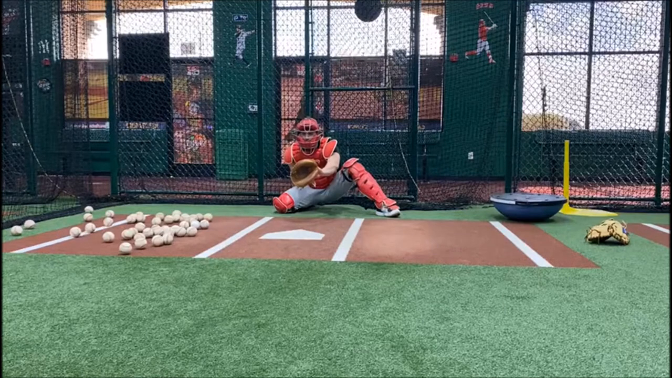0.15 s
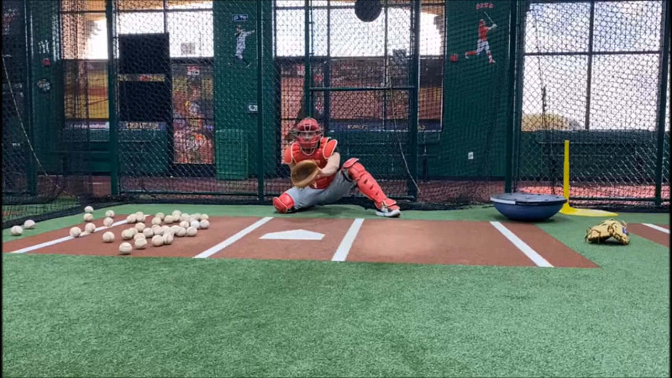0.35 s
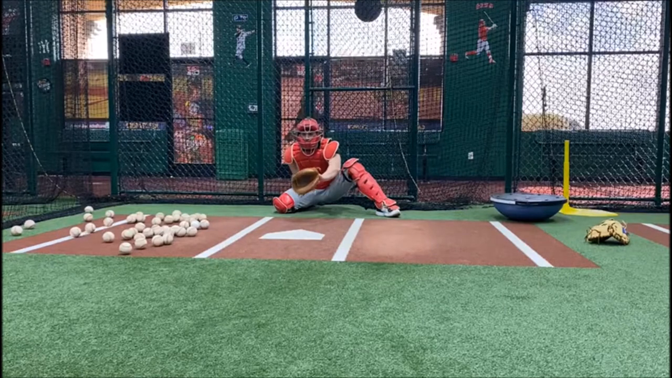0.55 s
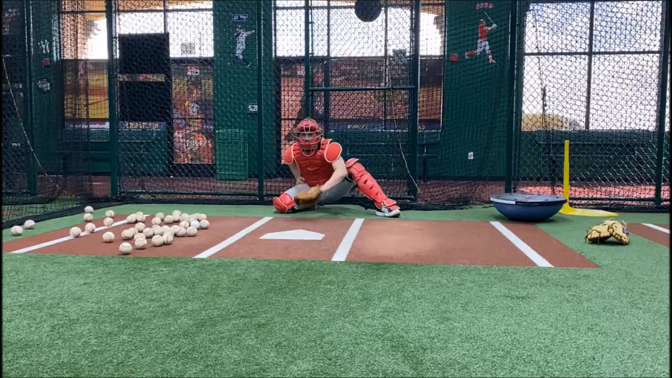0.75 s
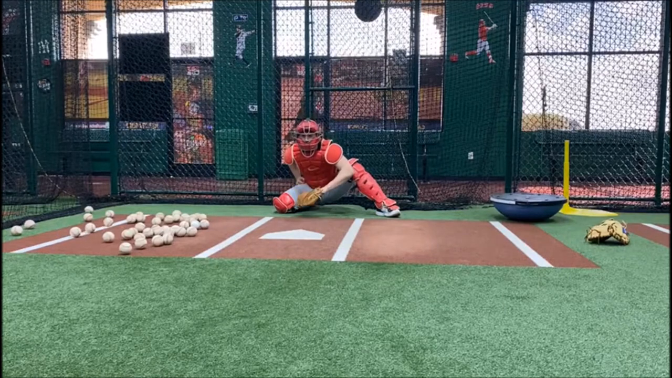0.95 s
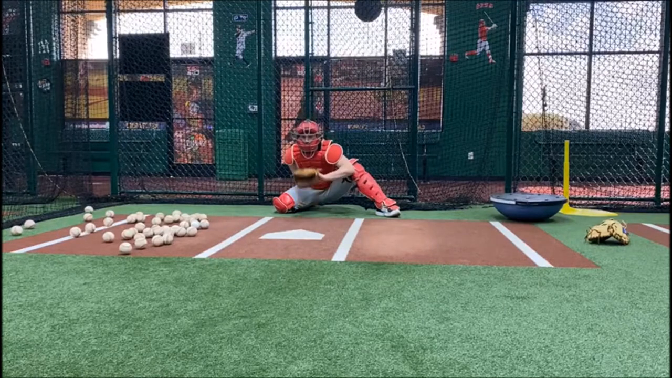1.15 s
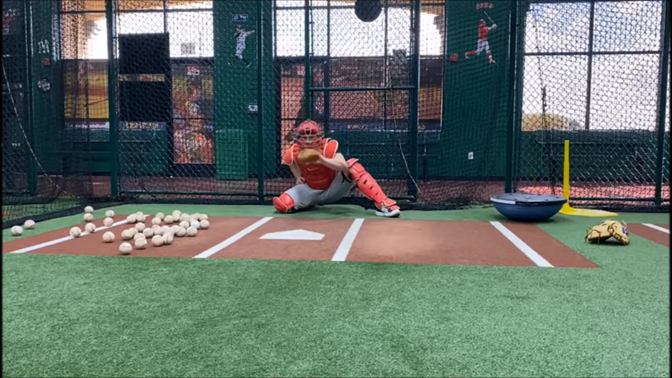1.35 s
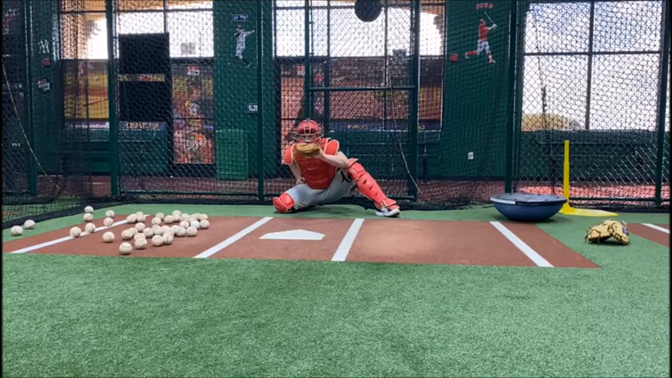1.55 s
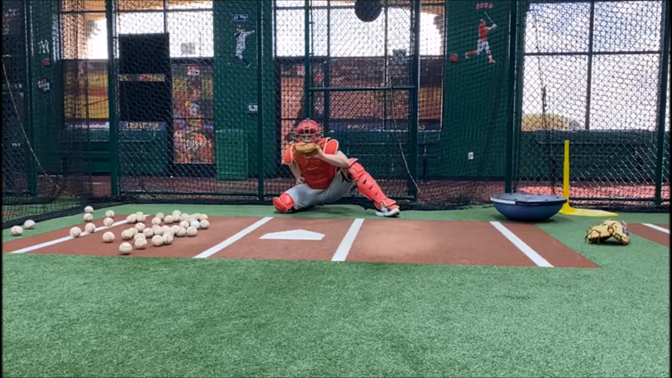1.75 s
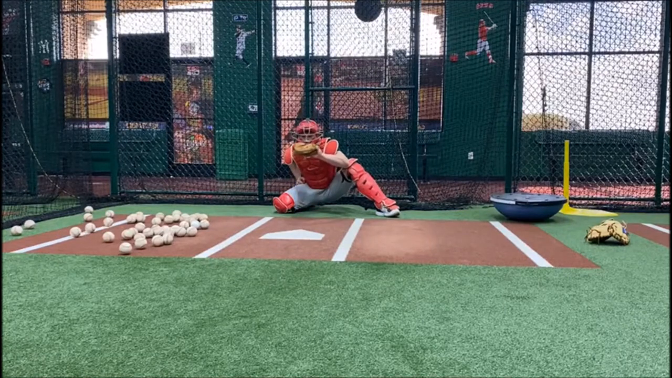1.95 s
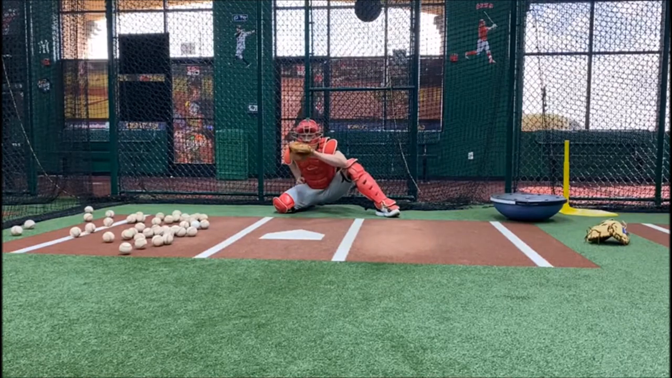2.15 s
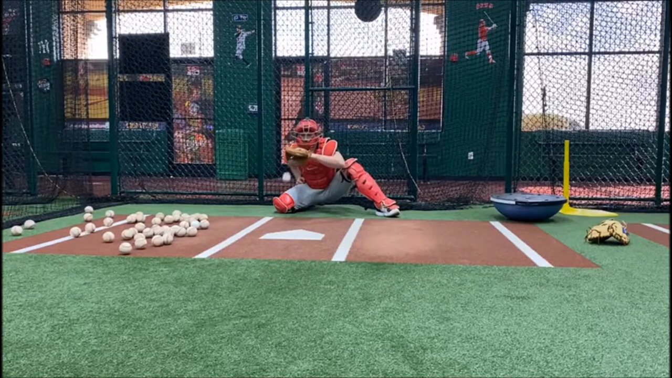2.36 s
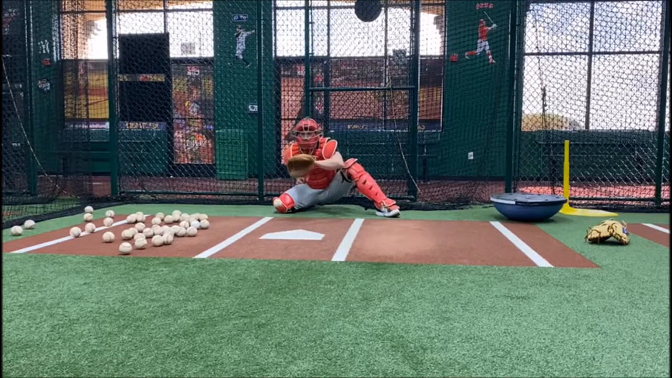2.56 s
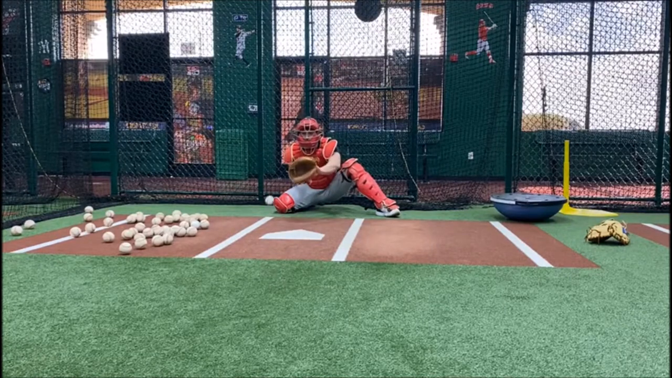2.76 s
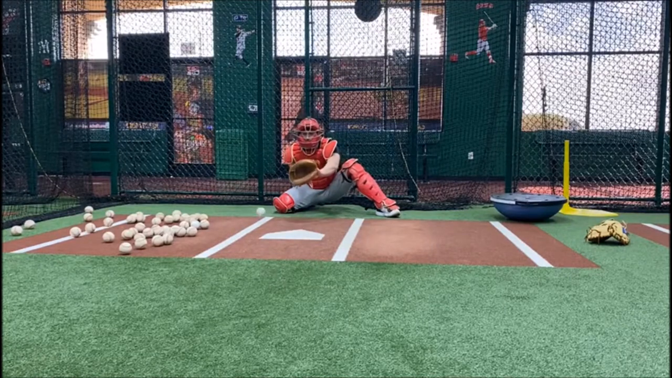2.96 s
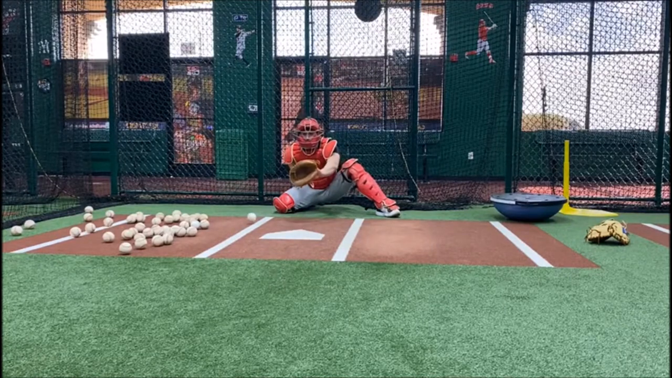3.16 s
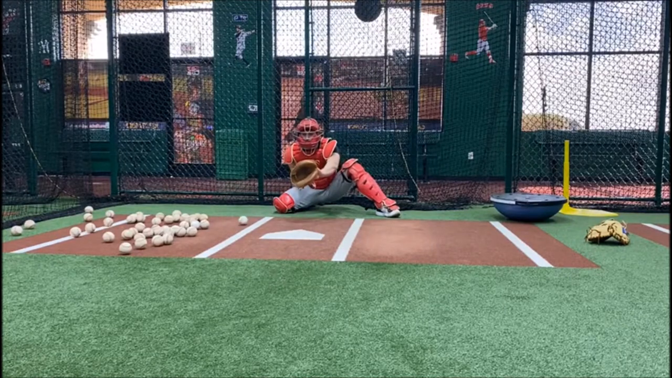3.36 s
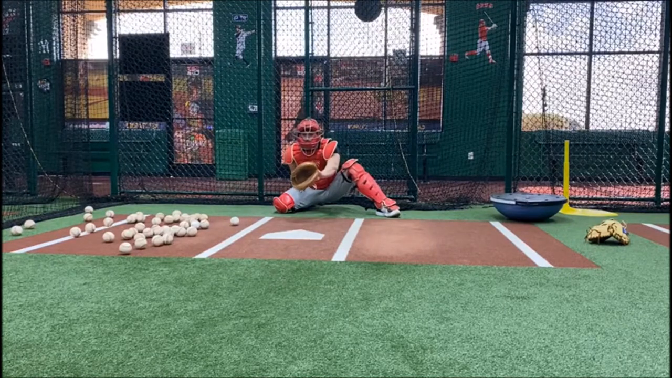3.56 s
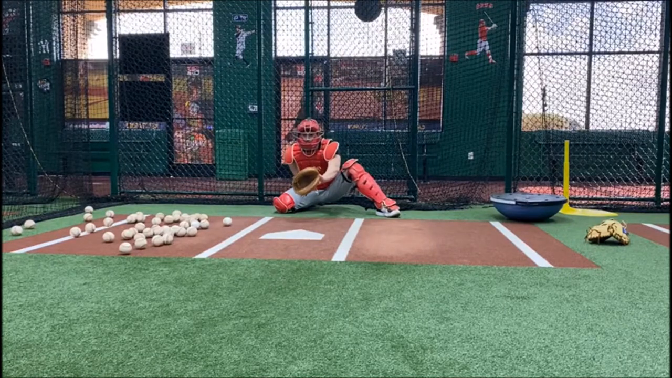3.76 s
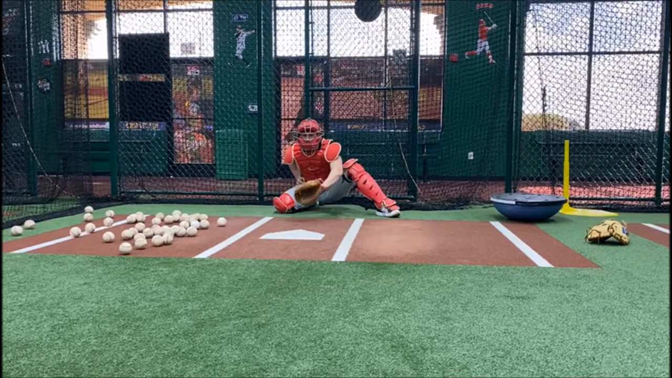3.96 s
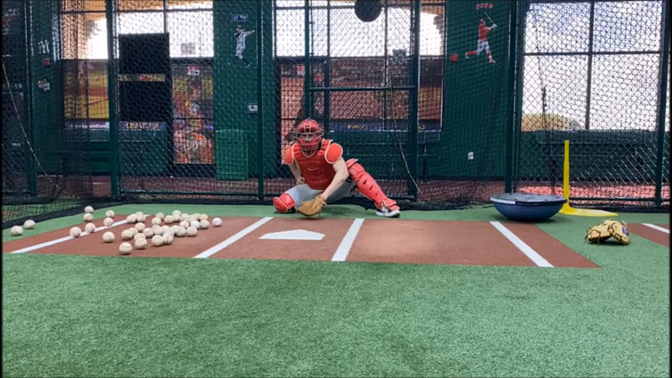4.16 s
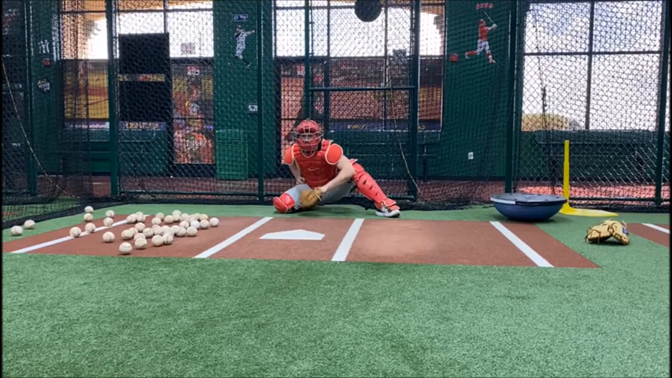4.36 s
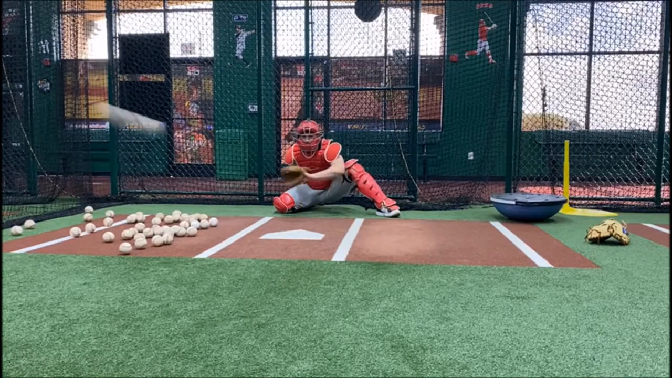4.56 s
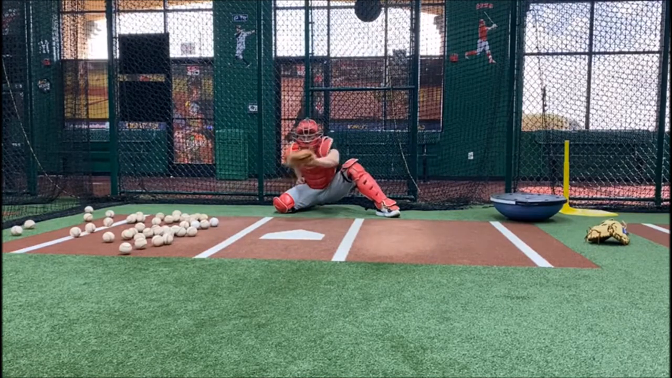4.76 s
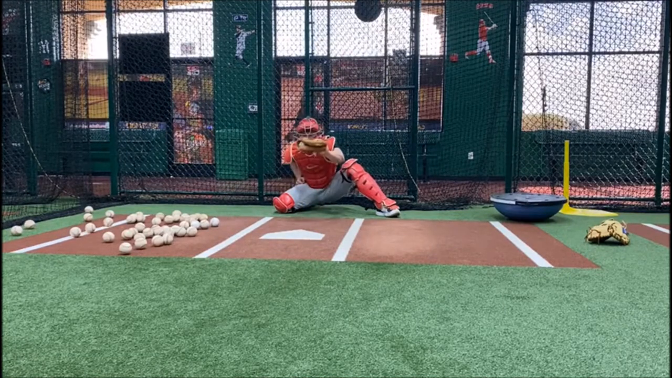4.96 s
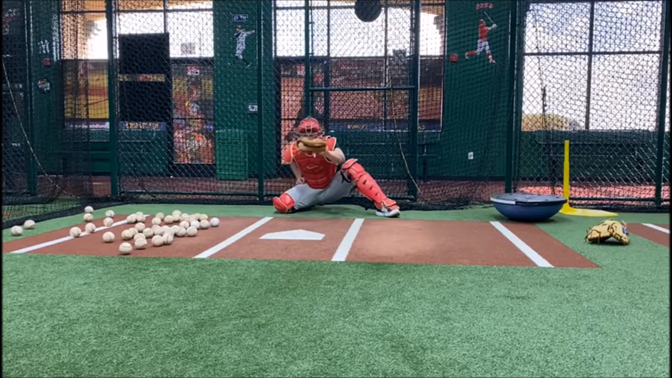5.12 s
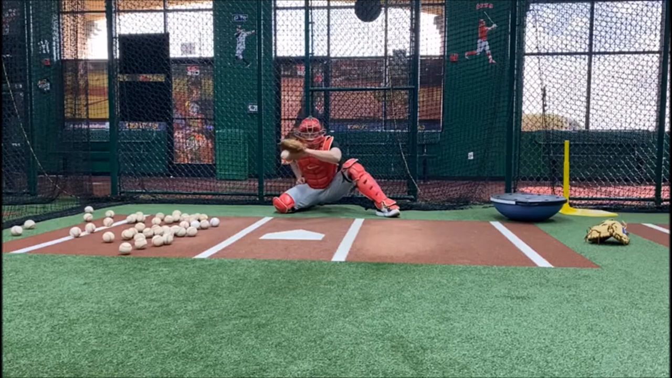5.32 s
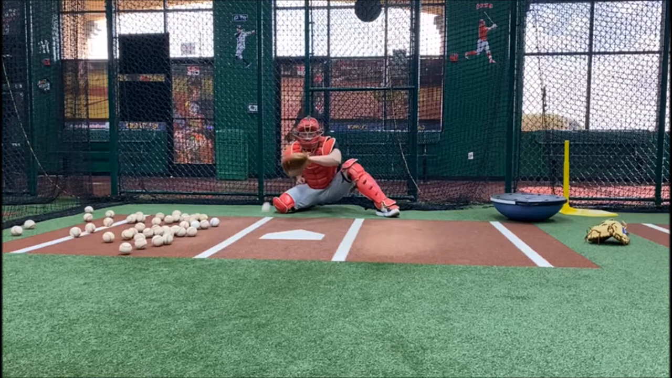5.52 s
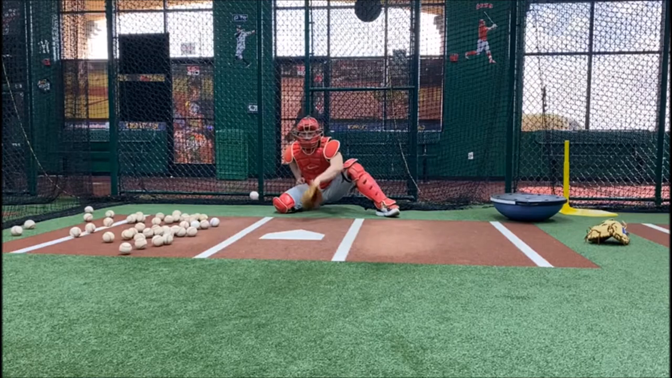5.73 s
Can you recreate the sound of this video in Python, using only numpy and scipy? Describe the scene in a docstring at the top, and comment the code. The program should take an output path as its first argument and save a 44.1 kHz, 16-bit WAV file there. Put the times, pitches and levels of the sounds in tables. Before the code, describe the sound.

Faint vent noise, a motor hum and a light wheel whirr run throughout in a large, echoing indoor batting cage. A dull boom and a knock come from another lane at the very start. At about 0.9 seconds a distant pitching machine bangs and clanks, its steel frame ringing. At 1.4 seconds a baseball cracks into a leather mitt close by, the loudest sound, with tiny leather creaks and quick wall echoes. A spent ball thuds softly on the turf at 2.5 seconds and bounces once. Faint, thin squeals glide by between 3.6 and 4.1 seconds. The machine bangs again, more softly, at 4.2 seconds, leaving a loose panel droning briefly. At 4.7 seconds the second ball lands in the mitt with a quieter, duller pop. Faint far knocks follow around 5 seconds, and another ball drops on the turf at 5.6 seconds.

```python
"""Two catches in an indoor batting cage

A pitching machine bangs far off. Half a second later the ball cracks into a leather mitt close by,
and the walls and hall answer. This happens twice; the first crack makes the volume duck briefly.
Spent balls drop on the turf, other lanes knock, and faint squeals glide by.
Behind it all, the vents blow, a motor hums and the machine's wheel whirrs."""
import sys
import numpy as np
from scipy import signal
from scipy.fft import rfft, irfft
from scipy.io import wavfile
from scipy.ndimage import uniform_filter1d, minimum_filter1d

SR = 44100
rng = np.random.default_rng(int(sys.argv[2]) if len(sys.argv) > 2 else 0)


def wav_out(sig):
    """Save sig, one row per channel (or a flat mono array), as 16-bit PCM at SR to the path in sys.argv[1]."""
    wavfile.write(sys.argv[1], SR, np.round(np.clip(np.atleast_2d(sig).T, -1, 1) * 32767).astype(np.int16))


N = 255339
T = np.arange(N) / SR
TAIL = 2 * SR  # samples set aside for a sound to ring out

# In all names, fade_s is the time to die away by 60 dB and rise_s is the time to build up.
# half_s is about half the length of a brief sound. Levels in dB add to those of the parts they scale.
# how long the hall rings: pitch_hz, fade_s
HALL_FADES = [(80, 2.3), (220, 2.1), (560, 1.66), (1100, 1.465), (2200, 1.78), (5000, 1.28), (10000, 0.76)]
# how alike left and right are in scattered sound (1 is the same): pitch_hz, likeness
LIKENESS = [(60, 1), (150, 0.97), (300, 0.38), (600, -0.5), (1500, 0.13), (3000, 0.1)]
# scattered treble leans mostly to the left: pitch_hz, left_minus_right_db
TREBLE_LEAN = [(2000, 0.5), (3600, 2.5), (6500, 3), (11000, -2)]
# sound from the side reaches the two channels out of step, one row each: shift_cycles
SIDE_SHIFT = np.array([[0], [.22]])
# tone of the air from the vents: pitch_hz, level_db
VENT_TONE = [(25, -14.5), (72, 2), (120, -8.5), (300, -15.5), (590, -16.5), (890, -23.5), (1400, -24),
             (2200, -26.5), (3500, -33.5), (5700, -34), (7700, -40), (8900, -65.5), (10100, -46),
             (12200, -80.5)]
# steady tones of the motor: pitch_hz, level_db
MOTOR_TONES = [(120, -69), (360.2, -55), (480.3, -78.5), (538.3, -76), (600, -70), (720.8, -71),
               (1443, -76.5)]
# faint far squeals: start_s, length_s, top_hz, drop_octaves, level_db
SQUEALS = [(3.581, .1, 1580, .02, -61), (3.741, .352, 2545, .52, -52)]
# a faint, very high hiss just after each catch: peak_s, level_db, half_s
HISSES = [(1.497, -52, .06), (4.795, -56, 0.045)]
# knocks in other lanes: start_s, level_db, rise_s, bass_db, treble_db, hollow_hz
KNOCKS = [(0.1139, -26, 0.0037, 0, -6, 635), (5.031, -37, 0.002, -2.5, -27, 900),
          (5.068, -40, 0.0021, -15.5, -27, 960), (5.623, -48.5, 0.0031, -16, -9, 650)]
# tone of a knock in the hall: pitch_hz, level_db
KNOCK_TONE = [(40, -21), (110, -13.5), (170, -5.5), (400, -11.5), (650, -9), (950, -17), (1400, -15),
              (2000, -13.5), (3500, -18), (7000, -19), (8500, -36), (10000, -16.5), (12000, -49.5)]
# a knock's hollow note arrives directly and by three walls: delay_s
HOLLOW_DELAYS = [.009, .042, .078, .099]
# dull booms about the hall: peak_s, pitch_hz, width_hz, level_db, half_s
BOOMS = [(0.038, 193, 330, -26.5, 0.036), (.076, 177.4, 70, -26, 0.015), (.48, 82, 130, -41.5, .14),
         (0.708, 245, 550, -46.5, 0.13)]
# spent balls landing on the turf: start_s, level_db
BALL_DROPS = [(2.543, -27), (5.62, -24.5)]
# a landing comes back from the nearest walls: delay_s, level_db
DROP_ECHOES = [(.011, -16), (.03, -8.5), (.1, -13)]
# notes of a loose panel: pitch_hz, level_db
PANEL_NOTES = [(307, -4), (409, 0.5), (416, 1), (474, -3.5), (555, -3.5), (635, -8.5)]
# each shot sets the machine's frame ringing: start_s, level_db, rise_s
SHOTS = [(.916, -24, 0.054), (4.235, -32.5, 0.0067)]
# notes of the steel frame: pitch_hz, fade_s, first_shot_db, second_shot_db
FRAME_NOTES = [(254, 1.6, -7, -4), (507, .95, 3, -12), (603, .8, -2, -12), (917, .8, -16, -4),
               (971, .8, 0, -14), (1069, .65, 1, -9), (1098, .6, 2, -4), (1129, .8, -2, 0),
               (1297, .9, -5, -14), (1331, .9, -8, -2), (1360, .8, -4, 1), (1474, .85, -1, -7),
               (1511, .7, -4, -10), (1589, .85, -3, -7), (1643, .8, -7, -6), (1740, .8, -8, -9),
               (1968, .9, -7, -6), (2043, .8, -7, -9), (2277, 1.2, -8, -11), (2682, .8, -11, -12),
               (2945, .8, -9, -11), (3666, .6, -13, -16)]
# the machine's bangs: start_s, level_db, rise_s, bass_db, clank_db, clank_hz, treble_db
BANGS = [(.906, -25.5, 0.0016, -2, 2, 1426, -1.5), (.914, -18, 0.0091, -13, 9, 1380, -5),
         (.934, -25.5, 0.0022, -6.5, 9.5, 1100, -10), (.981, -21.5, 0.0018, -12.5, 8, 1070, -16),
         (.99, -27, 0.0049, -8.5, 9, 546, -15), (4.231, -25.5, .009, -5.5, 5.5, 1340, 2),
         (4.262, -24.5, 0.0025, -9, 4.5, 1310, -16), (4.313, -31.5, .003, -14, 13, 627, -24),
         (4.448, -45, 0.0026, 7, 14, 1410, 3)]
# tone of a bang in the hall: pitch_hz, level_db
BANG_TONE = [(24, -33.5), (40, -15), (75, -5.5), (328, -0.5), (430, 1.5), (530, 3), (690, -6), (850, -8.5),
             (1090, -8), (1210, -11.5), (1380, -8), (1750, -13.5), (2050, -14.5), (2430, -16.5),
             (2950, -15), (3350, -16.5), (3700, -18), (4200, -16.5), (5800, -13.5), (8700, -26.5),
             (10800, -23.5), (12200, -89.5)]
# leather creaks as the mitt closes; the 1.433 s row is the first crack clicking back off a near wall: peak_s,
# level_db, pitch_hz, half_s
CREAKS = [(1.386, -48, 5990, 0.00057), (1.433, -19, 4200, 0.0012), (1.472, -19, 5600, 0.0012),
          (1.48, -22, 5600, 0.001), (1.539, -39, 7100, 0.014), (1.586, -24.5, 5130, 0.0011),
          (4.7316, -33, 5900, .0006), (4.736, -29, 8100, 0.00085)]
# echoes of a catch, the far ones weaker and duller: delay_s, level_db, pitch_hz, half_s
WALL_ECHOES = [(.0275, 0, 850, 0.0026), (.0345, 3, 560, .0016), (.044, -6, 620, 0.0014),
               (.066, -19, 700, .002), (.075, -10, 950, 0.0013), (.1345, -8, 640, 0.0024),
               (.1405, -10, 420, .002), (.1695, -7.5, 557, .0022), (.2015, -11.5, 436, .0016),
               (.248, -14, 336, .002)]
# the ball hits the mitt: start_s, crack_db, crack_half_s, thump_db, thump_hz, sag_s, thump_fade_s,
# slap_db, pop_db, walls_db, hall_db, hall_pop_db
CATCHES = [(1.3994, 11.5, 0.00046, 11.5, 711, 0.0014, 0.076, -13, -7.5, -21.5, -25, -27),
           (4.7259, -15.5, .0006, -3.5, 675, 0.002, 0.039, -17.5, -16.5, -17.5, -33, -21)]
# tone of the leather's crack: pitch_hz, level_db
CRACK_TONE = [(300, -24), (900, -13.5), (1900, 13), (3000, 3), (4200, 2), (6000, 3), (8500, -2),
              (10800, 2.5), (12500, -38.5)]
# tone of the hall's answer to a catch: pitch_hz, level_db
CATCH_HALL_TONE = [(40, -5.5), (100, -8.5), (250, 2.5), (500, -5.5), (900, -7.5), (2000, -3.5), (3500, -6),
                   (5500, -5.5), (8000, -23.5), (10500, -21.5), (12300, -53)]


def undb(db):
    """Turn decibels into a number to multiply by."""
    return 10 ** (np.asarray(db) / 20)


def unit(x):
    """Scale a sound to an average power of 1."""
    return x / np.sqrt(np.mean(x ** 2))


def sides(left_db):
    """Left and right gains that make the left louder by left_db."""
    return undb(np.array([[.5], [-.5]]) * left_db)


def along(points, f):
    """Read a (pitch_hz, value) table at the pitches f, blending between its rows."""
    hz, value = np.transpose(points)
    return np.interp(np.log(f), np.log(hz), value)


def freqs(size):
    """The pitches, in Hz, that make up a sound of this many samples."""
    return np.maximum(np.fft.rfftfreq(size, 1 / SR), 1)


def resonance(f, hz, width_hz):
    """How something that rings at hz answers each pitch; raising it to a power narrows it."""
    return 1 / (1 + 1j * (f * f - hz * hz) / (f * width_hz))


def fade(t, fade_s):
    """Die away by 60 dB every fade_s."""
    return np.exp(-np.log(1000) * t / fade_s)


def rise(t, rise_s):
    """Build up from 0 towards 1."""
    return 1 - np.exp(-t / rise_s)


def wander(t, points):
    """A wobbly line through a random value at each of the points."""
    return np.interp(t, points, rng.standard_normal(len(points)))


def add(out, x, start_s):
    """Mix x into out from start_s on."""
    i = int(round(start_s * SR))
    a, b = max(i, 0), min(i + x.shape[-1], N)
    out[:, a:b] += x[..., a - i:b - i]


def add_centred(out, x, middle_s):
    """Mix x into out with its middle at middle_s."""
    add(out, x, middle_s - x.shape[-1] / SR / 2)


def scattered_noise(tone, size):
    """Noise from all around with the given tone; long waves reach both ears alike."""
    f = freqs(size)
    alike = np.clip(along(LIKENESS, f), -1, 1)
    phases = np.exp(2j * np.pi * rng.random((2, len(f))))
    mid, side = phases * tone * np.sqrt([1 + alike, 1 - alike])  # the shared part and the differing part
    spectrum = np.array([mid + side, mid - side]) * sides(along(TREBLE_LEAN, f))
    return unit(irfft(spectrum, size))


def burst(tone_at, half_s):
    """A brief noise that swells and falls in a bell shape."""
    size = 2 * int(4 * half_s * SR)
    bell = np.exp(-.5 * (T[:size] / half_s - 4) ** 2)
    noise = scattered_noise(tone_at(freqs(size)), size) * bell
    return noise * np.sqrt(np.mean(bell ** 2) / np.mean(noise ** 2))


def add_burst(out, peak_s, db, hz, width_hz, half_s, order=2):
    """Mix in a burst of noise around hz; a higher order keeps it closer to that pitch."""
    noise = burst(lambda f: resonance(f, hz, width_hz) ** order, half_s)
    add_centred(out, undb(db) * noise, peak_s)


def ringing(hz, width_hz, rise_s, fade_s):
    """A noisy note heard through the hall: it swells and dies away."""
    noise = scattered_noise(resonance(freqs(TAIL), hz, width_hz) ** 2, TAIL)
    return noise * fade(T[:TAIL], fade_s) * rise(T[:TAIL], rise_s)


def hall_ring(tone, rise_s, bass_db=0, treble_db=0, fade_share=1, bass_hz=600, treble_hz=6500,
              note_gap_hz=35):
    """The hall's answer to a blow: echoes build up, then each range of pitch dies at its own pace."""
    f, t = freqs(TAIL), T[:TAIL]
    tilt_db = bass_db / (1 + (f / bass_hz) ** 4) + treble_db / (1 + (treble_hz / f) ** 4)
    # poles and panels ring along, so some pitches stand out by chance
    uneven_db = 2 * wander(f / note_gap_hz, np.arange(len(f)))
    spectrum = rfft(scattered_noise(undb(along(tone, f) + tilt_db + uneven_db), TAIL))
    band_hz, fades_s = np.transpose(HALL_FADES)
    ring = 0
    for weights, fade_s in zip(np.eye(len(band_hz)), fades_s):
        band = irfft(spectrum * along(np.c_[band_hz, weights], f))
        ring = ring + band * fade(t, fade_share * fade_s)
    # early echoes arrive in lumps before they blend
    lumps_db = 0.77 * np.exp(-t / 0.25) * wander(t / .004, np.arange(TAIL))
    return ring * undb(lumps_db) * rise(t, rise_s)


def thump(hz, sag_s, fade_s, contact_s, stop_s=0.029):
    """A padded blow: the padding gives way, halving the pitch in sag_s, until the ball stops."""
    t = T[:SR // 4]
    cycles = hz * sag_s * np.log1p(t / sag_s)
    stopping = np.exp(-(t / stop_s) ** 4)
    return -np.sin(2 * np.pi * cycles) * fade(t, fade_s) * rise(t, contact_s) * stopping


def vents(level_db=-52.5, lowest_hz=32):
    """Air from the vents rushes softly all around."""
    f = freqs(N)
    tone = undb(along(VENT_TONE, f)) / (1 + (lowest_hz / f) ** 4)
    return undb(level_db) * scattered_noise(tone, N)


def motor_hum(level_db=-4.5, waver_db=1, left_db=-14):
    """A motor hums on the right, each of its tones gently wavering in level."""
    hum = 0
    for hz, db in MOTOR_TONES:
        waver = wander(T, np.linspace(0, T[-1], 20))
        tone = np.sqrt(2) * np.sin(2 * np.pi * (hz * T + rng.random()))
        hum = hum + undb(db + level_db + waver_db * waver) * tone
    return hum * sides(left_db)


def wheel_whirr(level_db=-71, hiss_hz=2250, width_hz=600, turns_per_s=30.3, sharpness=1.1):
    """The machine's wheel rubs unevenly once a turn, making a light fluttering hiss."""
    turn_number = np.round(turns_per_s * T).astype(int)
    uneven_db = rng.standard_normal(N)[turn_number]
    rub = unit(np.exp(sharpness * np.cos(2 * np.pi * turns_per_s * T)) * undb(uneven_db))
    hiss = scattered_noise(resonance(freqs(N), hiss_hz, width_hz) ** 2, N)
    return undb(level_db) * rub * hiss


def squeals(climb_octaves=0.34, climb_share=0.67, drop_s=0.087, swell_db_per_s=50, edge_s=0.015):
    """Thin, unsteady tones climb, swell and drop at the end, then linger briefly in the hall."""
    out = np.zeros((2, N))
    for start_s, length_s, top_hz, drop_octaves, db in SQUEALS:
        t = T[:int(length_s * SR)]
        to_end_s = length_s - t
        below_top = np.maximum(1 - t / (climb_share * length_s), 0) ** 2
        falling = np.sin(np.pi / 2 * np.clip(1 - to_end_s / drop_s, 0, 1))
        pitch_hz = top_hz * 2 ** (-climb_octaves * below_top - drop_octaves * falling)
        pitch_hz *= 1 + 0.014 * wander(t, t[::200])
        soft_edges = np.minimum(np.minimum(t, to_end_s) / edge_s, 1)
        flutter_db = 4.5 * wander(t, t[::300])
        level = undb(db - swell_db_per_s * to_end_s + flutter_db) * soft_edges
        add(out, level * np.sin(2 * np.pi * np.cumsum(pitch_hz) / SR), start_s)
    hall = rng.standard_normal((2, SR)) * fade(T[:SR], fade_s=.7)
    lingering = signal.fftconvolve(out, hall / np.linalg.norm(hall[0]), axes=1)[:, :N]
    return undb(-2) * out + lingering


def high_hiss():
    """A faint, very high hiss comes just after each catch."""
    out = np.zeros((2, N))
    for peak_s, db, half_s in HISSES:
        add_burst(out, peak_s, db, hz=9900, width_hz=1500, half_s=half_s)
    return out


def other_lanes(chatter_gap_s=0.0059, chatter_loss_db=2):
    """Knocks in other lanes chatter, ring hollowly and ping; dull booms roll about the hall."""
    out = np.zeros((2, N))
    for start_s, db, rise_s, bass_db, treble_db, hollow_hz in KNOCKS:
        add(out, undb(db) * hall_ring(KNOCK_TONE, rise_s, bass_db, treble_db), start_s)
        for k in range(3):  # quick taps, each weaker than the last
            tap_s = start_s + 0.00104 + k * chatter_gap_s
            tap_db = db + treble_db + 2.5 - k * chatter_loss_db
            add_burst(out, tap_s, tap_db, hz=8500, width_hz=8500, half_s=.0005)
        for delay_s in HOLLOW_DELAYS:
            add_burst(out, start_s + delay_s, db + bass_db + 0.5, hollow_hz, width_hz=250, half_s=0.005)
        ping = ringing(hz=2145, width_hz=340, rise_s=rise_s, fade_s=0.063)
        add(out, undb(db + 5.5) * ping, start_s)
        # a soft wash of noise swells shortly after each knock
        add_burst(out, start_s + 0.23, db - 16.5, hz=1860, width_hz=930, half_s=0.062)
    for peak_s, hz, width_hz, db, half_s in BOOMS:
        add_burst(out, peak_s, db, hz, width_hz, half_s, order=4)
    return out * sides(left_db=0.35)


def dropped_balls(bounce_s=.391, bounce_db=-11.5):
    """Spent balls land on the turf with a thud and a tick, echo off the walls and bounce once."""
    out = np.zeros((2, N))
    thud = thump(hz=358, sag_s=0.015, fade_s=0.04, contact_s=0.0017, stop_s=.04)
    for start_s, db in BALL_DROPS:
        add(out, undb(db) * thud, start_s)
        add_burst(out, start_s + .001, db - 24, hz=3000, width_hz=3000, half_s=.0005)
        for delay_s, echo_db in DROP_ECHOES:
            add(out, undb(db + echo_db) * thud, start_s + delay_s)
        if start_s + bounce_s < T[-1]:
            add(out, undb(db + bounce_db) * thud, start_s + bounce_s)
    return out


def loose_panel(start_s=4.328, level_db=-21):
    """A loose panel, shaken by the second shot, drones on; its close notes throb together."""
    out, t = np.zeros((2, N)), T[:TAIL]
    notes = sum(undb(db) * np.sin(2 * np.pi * (hz * t + rng.random((2, 1)))) for hz, db in PANEL_NOTES)
    add(out, undb(level_db) * notes * fade(t, fade_s=0.74) * rise(t, rise_s=0.15), start_s)
    return out


def frame_ring():
    """The machine's steel frame rings; each shot wakes its own mix of the same notes."""
    out, t = np.zeros((2, N)), T[:TAIL]
    for shot, (start_s, db, rise_s) in enumerate(SHOTS):
        ring = 0
        for hz, fade_s, *shot_db in FRAME_NOTES:
            cycles = hz * t + rng.random() + rng.permutation(SIDE_SHIFT)
            ring = ring + undb(shot_db[shot]) * np.sin(2 * np.pi * cycles) * fade(t, fade_s)
        add(out, undb(db) * ring * rise(t, rise_s), start_s)
    return out


def pitching_machine():
    """The machine bangs and clanks so far off that it is heard through the hall's echoes."""
    out = np.zeros((2, N))
    for start_s, db, rise_s, bass_db, clank_db, clank_hz, treble_db in BANGS:
        bang = hall_ring(BANG_TONE, rise_s, bass_db, treble_db,
                         fade_share=0.74, treble_hz=4500, note_gap_hz=60)
        clank = ringing(clank_hz, width_hz=0.46 * clank_hz, rise_s=rise_s / 2, fade_s=0.12)
        add(out, undb(db) * bang + undb(db + clank_db) * clank, start_s)
    return out


def leather_creaks():
    """The mitt creaks as it closes on the ball, and the first crack clicks back off a near wall."""
    out = np.zeros((2, N))
    for peak_s, db, hz, half_s in CREAKS:
        add_burst(out, peak_s, db, hz, .45 * hz, half_s, order=3)
    return out


def bass_swell(delay_s=0.17):
    """The thump of a catch wakes the hall's deepest note."""
    out = np.zeros((2, N))
    for start_s, _, _, thump_db, *_ in CATCHES:
        add_burst(out, start_s + delay_s, thump_db - 45, hz=50.4, width_hz=3.3, half_s=.041)
    return out


def pock(hz, half_s):
    """One hollow echo: a few waves that swell and fall in a bell shape."""
    size = 2 * int(4 * half_s * SR)
    t = T[:size] - size / SR / 2
    bell = np.exp(-.5 * (t / half_s) ** 2)
    return np.sqrt(2) * np.cos(2 * np.pi * (hz * t + SIDE_SHIFT + rng.random())) * bell


def wall_echoes(scatter_db=-8.5, scatter_stretch=2.4):
    """Walls on each side in turn throw a catch back as a pock with weaker, longer scattered noise."""
    out = np.zeros((2, N))
    for start_s, *_, walls_db, _, _ in CATCHES:
        for k, (delay_s, db, hz, half_s) in enumerate(WALL_ECHOES):
            peak_s = start_s + delay_s
            echo = undb(walls_db + db) * pock(hz, half_s)
            add_centred(out, echo[::-1] if k % 2 else echo, peak_s)
            add_burst(out, peak_s, walls_db + db + scatter_db, hz, 2 * hz, scatter_stretch * half_s)
    return out


def air_puffs(lead_s=0.0085):
    """Air is squeezed from the mitt just before the ball lands, more for a harder catch."""
    out = np.zeros((2, N))
    for start_s, _, _, thump_db, *_ in CATCHES:
        add_burst(out, start_s - lead_s, thump_db - 37, hz=125, width_hz=250, half_s=0.0045)
    return out


def mitt(pocket_hz=649, pocket_width_hz=690):
    """Leather cracks, the fingers slap shut, the mitt's pocket thumps and pops, and the hall answers."""
    out = np.zeros((2, N))
    for (start_s, crack_db, crack_half_s, thump_db, thump_hz, sag_s, thump_fade_s,
         slap_db, pop_db, _, hall_db, hall_pop_db) in CATCHES:
        crack = undb(crack_db) * burst(lambda f: undb(along(CRACK_TONE, f)), crack_half_s)
        slap = undb(slap_db) * burst(lambda f: resonance(f, hz=2330, width_hz=860), half_s=.0019)
        for mid, side in (crack, slap):
            add_centred(out, np.array([mid + side, mid - side]) / np.sqrt(2), start_s)
        thud = thump(thump_hz, sag_s, thump_fade_s, contact_s=0.0002)
        add(out, undb(thump_db) * thud, start_s + .001)
        pop = burst(lambda f: resonance(f, pocket_hz, pocket_width_hz) ** 2, half_s=0.0022)[0]
        add_centred(out, undb(pop_db) * pop, start_s + 0.0028)
        add(out, undb(hall_db) * hall_ring(CATCH_HALL_TONE, rise_s=0.00785), start_s + .007)
        hall_pop = ringing(pocket_hz, pocket_width_hz, rise_s=0.026, fade_s=0.67)
        add(out, undb(hall_pop_db) * hall_pop, start_s)
    return out


def scene():
    """All the sounds, added together."""
    catches = mitt() + wall_echoes() + air_puffs() + bass_swell()
    shots = pitching_machine() + frame_ring() + loose_panel()
    small_sounds = other_lanes() + dropped_balls() + leather_creaks() + high_hiss() + squeals()
    background = wheel_whirr() + vents() + motor_hum()
    return background + small_sounds + shots + catches


def duck(x, ceiling_db=-12, recover_db_per_s=78, treble_hz=1500):
    """Turn the volume down just ahead of loud treble, then bring it steadily back."""
    treble = signal.sosfilt(signal.butter(2, treble_hz, "high", fs=SR, output="sos"), x)
    power = uniform_filter1d(np.mean(treble ** 2, axis=0), size=64)
    over_db = np.maximum(10 * np.log10(np.maximum(power, 1e-12)) - ceiling_db, 0)
    duck_db = np.maximum.accumulate(over_db + recover_db_per_s * T) - recover_db_per_s * T
    gain_db = minimum_filter1d(-duck_db, size=220)  # widen the dip so that it starts early
    return x * undb(uniform_filter1d(gain_db, size=80))


def record(dry):
    """Duck the loud crack, round off the tallest peaks and cut the highest treble."""
    peak_limit, top_hz = .75, 11700
    ducked = duck(dry)
    rounded = ducked / (1 + (ducked / peak_limit) ** 4) ** .25
    return signal.sosfilt(signal.ellip(8, .2, 70, top_hz, fs=SR, output="sos"), rounded)


dry = scene()
out = record(dry)
wav_out(out)
```